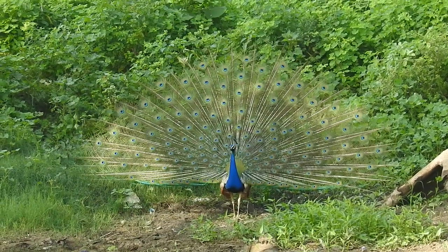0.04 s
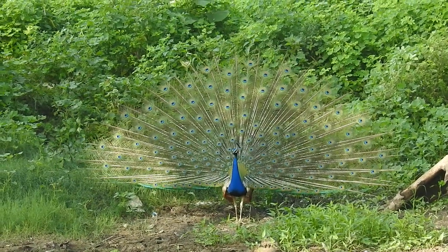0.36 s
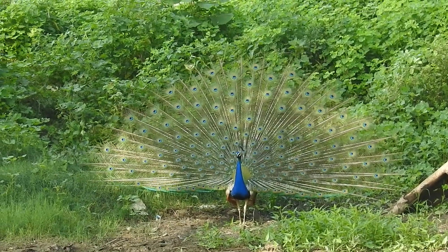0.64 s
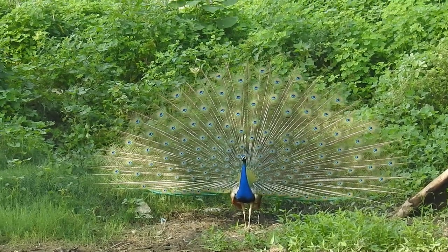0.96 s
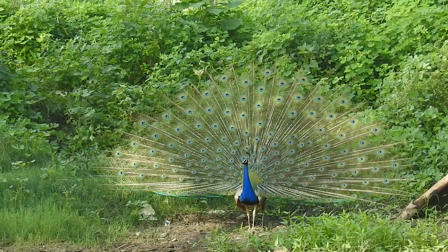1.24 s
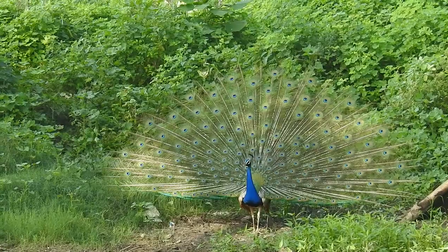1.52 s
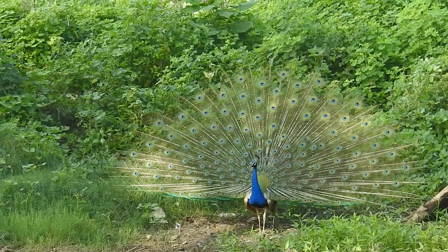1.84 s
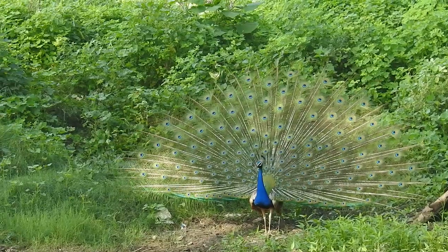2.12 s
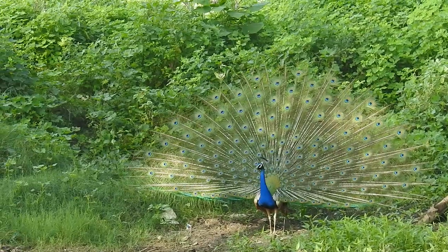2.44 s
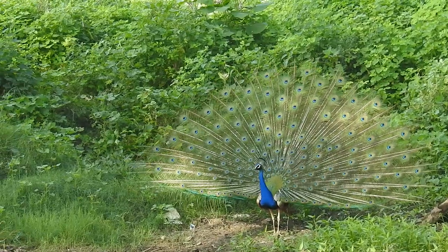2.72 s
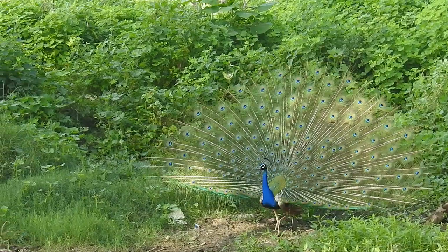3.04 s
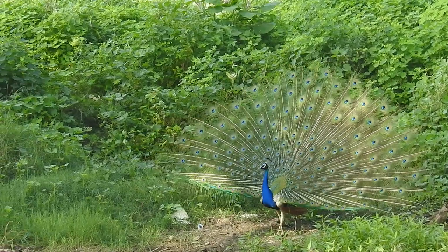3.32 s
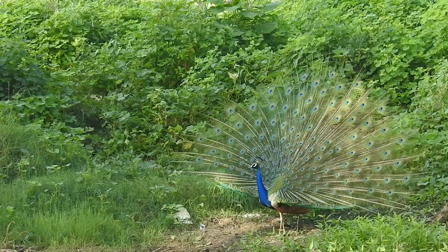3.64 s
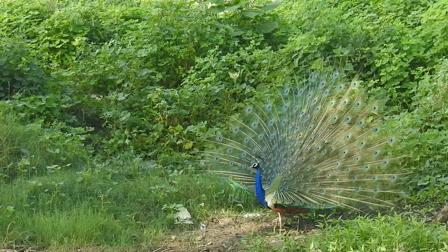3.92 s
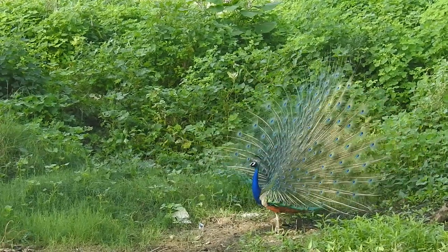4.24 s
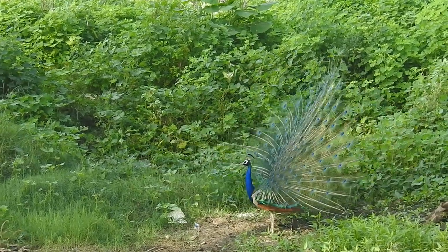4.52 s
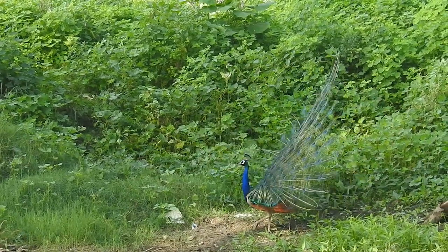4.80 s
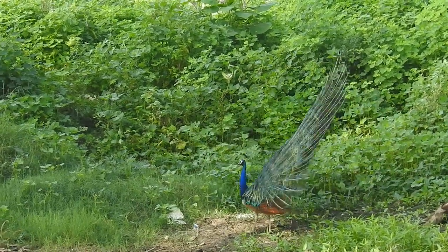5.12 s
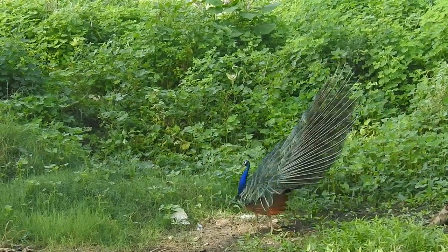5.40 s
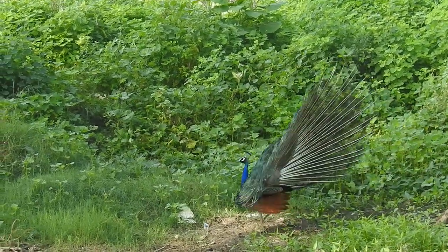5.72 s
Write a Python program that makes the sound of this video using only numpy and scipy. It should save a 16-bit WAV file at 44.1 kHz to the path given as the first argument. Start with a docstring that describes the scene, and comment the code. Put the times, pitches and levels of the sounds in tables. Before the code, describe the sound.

Harsh peacock screams ring out about once a second in a wood, with faint chirps, far coos and steady leaf hiss.

```python
"""A peacock stands at the edge of a wood; a distant engine throbs under hissing foliage and small birds chirp.
At once comes the first of six harsh, arching screams, a bird's membrane driven into rasp, scattering in
the trees. From 0.9 s far birds coo and whoop; at 2 s a hoarse wail starts to sink and a gust puffs by.
Three dry ticks snap between 3 and 4 s, then double chips and clear mews lead up to the last scream."""
import sys
import numpy as np
from scipy import signal
from scipy.fft import rfft, irfft, next_fast_len
from scipy.io import wavfile

SR = 44100
rng = np.random.default_rng(int(sys.argv[2]) if len(sys.argv) > 2 else 0)


def store_wav(level_fs):
    """Save 16-bit WAV to argv[1]."""
    pcm = np.round(np.clip(np.atleast_2d(level_fs), -1, 1) * 32767)
    wavfile.write(sys.argv[1], SR, pcm.T.astype(np.int16))


N = 262836
TIME = np.arange(N) / SR
CUTOFF_HZ = 15600

# Six screams, the first in two parts: (time [s], climb [s], hold [s], tumble [s], start pitch [Hz],
# top pitch [Hz], break pitch [Hz], climb level [dB], top level [dB], break level [dB],
# held rasp [0-1], sliding rasp [0-1], odd harmonics [dB])
SCREAMS = [ (.175, 0.053, 0.016, 0.031, 1850, 2876, 2563, -23.5, -22, -19, 0.37, 0.46, -9.5),
           (0.294, 0.013, 0.017, 0.023, 2493, 2550, 2360, -36, -22, -18.5, 0.4, 0.6, -4.5),
           (1.152, .052, .048, 0.031, 800, 2680, 2420, -22, -29, -15.5, .26, 0.82, -5),
           (2.202, .072, 0.033, 0.18, 1500, 2751, 2553, -20, -31, -19, .46, .66, -2),
           (3.297, .06, .041, 0.177, 1348, 2950, 2572, -22.5, -26, -19, .42, .66, -1),
           (4.565, .116, .117, .085, 780, 2800, 1600, -19, -17.5, -21.5, .34, .52, 2),
           (5.43, 0.051, 0.046, 0.033, 746, 2736, 2424, -20.5, -25, -16.5, 0.24, .75, -4)]
# Colour of the rasp: (frequency [Hz], level [dB])
RASP_EQ = [(1200, -60), (1900, -6), (2600, -3.5), (4100, 9.5), (5200, -5.5), (6200, 0.5), (7300, 0.5),
           (8500, -10.5), (10000, -13.5), (13000, -45)]
def screams(jitter=0.0505, shake=0.83, beat=0.65, beat_hz=620, fade_db_per_s=102, beak_opens_s=0.033):
    """A hard-driven membrane brightens and turns chaotic: it beats, shakes and breaks into rasp."""
    out, size = np.zeros(N), SR // 2
    for start, climb, hold, tumble, *arch_hz, climb_db, top_db, break_db, held, sliding, odd_db in SCREAMS:
        t, gate, pitch = arch_pitch(climb, hold, tumble, *arch_hz, slack_hz=838, relax_s=.035)
        break_s, n = climb + hold, len(t)
        # Pushed on the way up and again at the break, then left to fade.
        level_db = np.interp(t, [0, .6 * climb, climb, break_s], [climb_db - 8, climb_db, top_db, break_db])
        level_db -= fade_db_per_s * np.maximum(t - break_s, 0)
        # The voice clears along its top and roughens after the break.
        rasp_times = [climb, climb + .75 * hold, break_s, break_s + 0.028]
        rasp = np.interp(t, rasp_times, [sliding, held, held, sliding])
        tilt_db = 0.47 * np.minimum(level_db + 24, 0)   # softer is duller
        tone = syrinx(pitch * (1 + jitter * rasp * flutter(size, 450)[:n]), tilt_db, odd_db)
        beat_rate = beat_hz * (1 + 0.2873 * flutter(size, 55.7)[:n])
        sidebands = 1 + beat * rasp * np.sin(phase_of(beat_rate))
        voice = np.sqrt(1 - rasp ** 2) * tone * sidebands + rasp * stereo_noise(RASP_EQ, size)[0, :n]
        beak = np.clip(t / beak_opens_s, 0, 1) ** 2   # the treble comes out as the beak opens
        voice = beak * voice + (1 - beak) * lowpass(voice, 3680)
        tremor = 1 + shake * rasp * np.tanh(flutter(size, 300)[:n])
        add(out, start, gate * from_db(level_db) * voice * tremor)
    return out


# Resonances of the throat: (frequency [Hz], level [dB])
THROAT_EQ = [(600, -24), (1200, -4), (2000, -9), (2700, 4.5), (3600, 4.5), (5000, 6), (6000, 2), (7300, -7),
             (8500, -13.5), (10000, -18.5), (12500, -39.5)]
def syrinx(pitch, tilt_db, odd_db):
    """A vibrating membrane's harmonics, tilted per octave and shaped by the throat, at constant power."""
    order = np.arange(1, 13)[:, None]
    source_db = tilt_db * np.log2(order) + odd_db * (order % 2)
    gains = from_db(at_hz(THROAT_EQ, order * pitch) + source_db) * (order * pitch < CUTOFF_HZ)
    tone = (gains * np.sin(order * phase_of(pitch))).sum(0)
    return tone / np.sqrt((gains ** 2).sum(0) / 2 + 1e-12)


# Whistles inside the screams: (time [s], length [s], start pitch [Hz], end pitch [Hz], level [dB])
SECOND_VOICE = [(.175, .035, 3850, 4000, -25), (.24, 0.073, 3870, 3280, -17.5),
                (1.15, 0.041, 2704, 3400, -27.5), (1.195, 0.039, 3553, 3300, -19.5),
                (2.21, .045, 3400, 4500, -21.5), (2.238, .046, 3750, 3595, -17),
                (2.36, .03, 3440, 3400, -23.5), (3.305, 0.036, 3260, 3980, -22.5),
                (4.648, .04, 5000, 3400, -17.5), (4.695, .04, 5000, 4400, -18),
                (4.74, 0.067, 4165, 3250, -19.5)]
def second_voice():
    """A clearer voice slides through the rasp of the screams."""
    return glides(SECOND_VOICE, arch=.005, waver=0.013, waver_hz=380, overtone_db=-14.5)


# Mewing calls: (time [s], climb [s], hold [s], tumble [s], start pitch [Hz], top pitch [Hz],
# break pitch [Hz], level [dB])
MEWS = [(4.895, 0.033, .022, .12, 3200, 3680, 3450, -31), (5.125, .075, .018, .135, 2744, 5405, 4900, -39),
        (5.204, 0.014, .03, 0.019, 3945, 3900, 2950, -28.5)]
def mews(jitter=0.04, swell_db_per_s=110, fade_db_per_s=60):
    """Clear arched calls that swell up to the break and fade after it."""
    out = np.zeros(N)
    for start, climb, hold, tumble, *arch_hz, level_db in MEWS:
        t, gate, pitch = arch_pitch(climb, hold, tumble, *arch_hz, slack_hz=1920, relax_s=.033)
        past_break = t - climb - hold
        swell_db = np.minimum(swell_db_per_s * past_break, -fade_db_per_s * past_break)
        tone = whistle(pitch * (1 + jitter * flutter(SR, 315)[:len(t)]), overtone_db=-13)
        add(out, start, gate * from_db(level_db + swell_db) * tone)
    return lowpass(out, 7500)


# One bird's pips on a single note: (time [s], level [dB])
BIRD_PIPS = [(.03, -37.5), (.55, -38.5), (4.039, -40.5), (4.282, -33), (4.53, -32), (5.025, -39),
             (5.77, -37)]
# Another's double chips: (time [s], level [dB])
DOUBLE_CHIPS = [(3.954, -44), (4.196, -37.5), (4.442, -35.5)]
# Single slurs: (time [s], length [s], start pitch [Hz], end pitch [Hz], level [dB])
SLURS = [(1.01, 0.095, 4260, 3720, -41), (1.42, .07, 3300, 2810, -39.5), (1.45, 0.04, 3630, 4110, -34),
         (1.55, 0.059, 2880, 2440, -42), (1.83, .1, 3930, 3900, -43), (1.92, 0.062, 3110, 2630, -40),
         (1.98, .08, 3940, 3940, -40.5), (2.575, 0.073, 3470, 2590, -39)]
def small_birds(pip_s=0.035, pip_hz=4347, chip_s=.022, chip_hz=5200, chip_gap_s=0.019):
    """Thin whistles from the near bushes; each double chip is a shallow fall, then a steep one."""
    pips = [(start, pip_s, pip_hz, pip_hz, db) for start, db in BIRD_PIPS]
    chips = [(start + delay, chip_s, chip_hz, end_hz, db)
             for start, db in DOUBLE_CHIPS for delay, end_hz in [(0, 4680), (chip_gap_s, 4070)]]
    return (glides(pips, arch=.004, waver=0.0064)
            + glides(chips, arch=0.02, waver=0.0062)
            + glides(SLURS, arch=0.0085, waver=.018, waver_hz=300))


# Dry ticks: (time [s], relative level [dB])
DRY_TICKS = [(3.243, -25), (3.6418, -20), (3.85, -19)]
def ticks(t60_s=0.019, trim_db=-7, size=SR // 10):
    """Bright snaps of noise that die within milliseconds."""
    out = np.zeros(N)
    decay_db = -60 * TIME[:size] / t60_s
    for start, level_db in DRY_TICKS:
        snap = stereo_noise([(1200, -33), (4500, 5), (8000, 4), (14000, -38)], size)[0]
        add(out, start, from_db(level_db + trim_db + decay_db) * snap)
    return out


def chatter(from_s, to_s, floor_db, count):
    """Many small birds far off slur short hoarse notes at random."""
    when, length, height, slide, strength = rng.random((count, 5)).T
    starts = from_s + when * (to_s - from_s)
    from_hz = 2500 + 1900 * height
    to_hz = from_hz * (.72 + 0.32 * slide)
    notes = zip(starts, 0.033 + 0.088 * length, from_hz, to_hz, floor_db + 4 * strength)
    return glides(notes, arch=0.0524, waver=0.027, waver_hz=310)


# Whoops, each one arch of pitch: (time [s], length [s], base pitch [Hz], level [dB])
FAR_WHOOPS = [(.95, 0.18, 627, -44.5), (1.22, 0.163, 593, -45), (1.37, 0.09, 660, -49),
              (1.73, 0.14, 601, -46.5), (3.06, 0.1, 615, -41.5), (3.24, 0.08, 610, -39),
              (3.335, 0.066, 773, -35), (3.49, 0.0935, 749, -36.5), (3.6, 0.12, 678, -41),
              (3.74, 0.059, 607, -41), (3.8, 0.089, 532, -45)]
# A dove's coos: (time [s], length [s], start pitch [Hz], level [dB])
DOVE_COOS = [(.9, 0.11, 560, -50), (1.25, 0.54, 533.5, -57.5), (2.07, 0.079, 550, -45.5),
             (2.8, 0.13, 559, -45), (3.18, 0.46, 528, -49.5), (4.0, 0.11, 557, -47),
             (4.79, 0.117, 566, -46.5), (5.13, 0.58, 514, -50)]
def far_birds(coo_end_hz=530):
    """Two bouts of whoops, and a dove whose every coo settles on the same low note."""
    whoops = [(start, length, hz, hz, db) for start, length, hz, db in FAR_WHOOPS]
    coos = [(start, length, hz, coo_end_hz, db) for start, length, hz, db in DOVE_COOS]
    return glides(whoops, arch=0.155, waver=0.039) + glides(coos, arch=0.0066, waver=0.018)


# Contour of the far wail: (time [s], pitch [Hz], level [dB])
WAIL_CURVE = [(2.0, 1140, -52.5), (2.15, 1098, -45), (2.6, 1031, -51.5), (3.25, 894, -50.5)]
def wail(width_hz=110, size=2 * SR):
    """A hoarse, blurred tone: a narrow band of noise that sinks slowly."""
    out = np.zeros(N)
    times, pitches, levels_db = np.transpose(WAIL_CURVE)
    t = times[0] + TIME[:size]
    gate = np.clip(np.minimum(t - times[0], times[-1] - t) / .008, 0, 1)
    phase = phase_of(np.interp(t, times, pitches))
    band = flutter(size, width_hz) * np.cos(phase) + flutter(size, width_hz) * np.sin(phase)
    add(out, times[0], gate * from_db(np.interp(t, times, levels_db)) * band)
    return out


# Drift of the engine: (time [s], third harmonic [Hz], relative level [dB])
ENGINE_DRIFT = [(0.0, 96.0, -40.5), (2.17, 91.4, -39.5), (2.79, 96.1, -40), (5.96, 96.2, -40.5)]
# Successive multiples of the firing rate: (relative level [dB])
EXHAUST_HARMONICS = [-51, -5, 2, -9.5, -10.5, -13, -19.5]
def engine(waver=.2, trim_db=-0.3):
    """Only the low harmonics of the exhaust carry this far, each wavering on the way."""
    times, third_hz, levels_db = np.transpose(ENGINE_DRIFT)
    phase = phase_of(np.interp(TIME, times, third_hz) / 3)
    throb = sum(from_db(db) * np.cos(k * phase) * (1 + waver * flutter(next_fast_len(N), 2.1)[:N])
                for k, db in enumerate(EXHAUST_HARMONICS, 1))
    return np.sqrt(2) * from_db(np.interp(TIME, times, levels_db) + trim_db) * throb


# Rise and fall of the breeze: (time [s], relative level [dB])
BREEZE_CURVE = [(0.0, -54), (2.17, -61), (2.34, -52), (5.66, -63.5), (5.96, -62)]
# One gust arriving in puffs: (time [s], level [dB])
GUST_PUFFS = [(2.35, -36.5), (2.43, -34), (2.54, -32)]
def wind(breeze_trim_db=4, puff_s=0.039, crossfeed=0.42, low_cut_hz=46):
    """Lumps of air brush each microphone port on its own; the deepest rumble does not pass."""
    ports = np.array([flutter(next_fast_len(N), 43)[:N] for port in range(2)])
    low_cut = signal.butter(4, low_cut_hz, "high", fs=SR, output="sos")
    rumble = unit_rms(signal.sosfilt(low_cut, ports))
    breeze = from_db(np.interp(TIME, *np.transpose(BREEZE_CURVE)) + breeze_trim_db)
    puffs = sum(from_db(db) * np.exp(-((TIME - centre) / puff_s) ** 2) for centre, db in GUST_PUFFS)
    return (breeze + puffs) * (rumble + crossfeed * rumble[::-1])


# Colours of the open air and of the leaves: (frequency [Hz], level [dB])
AIR_EQ = [(22, -38), (46, -2.5), (110, -0.5), (200, -8.5), (400, -23), (660, -17), (1300, -25.5),
          (2600, -17), (6600, -28.5), (9000, -40), (15500, -51)]
FOLIAGE_EQ = [(1400, -4), (2600, 8), (3200, 3), (4000, 9.5), (4700, 5), (5400, 6), (6000, 3), (6700, 6.5),
              (8500, -28), (13000, -40)]
def air_and_foliage():
    """A steady bed: low outdoor air under the hiss of leaves."""
    return from_db(-41.5) * stereo_noise(AIR_EQ) + from_db(-46.5) * stereo_noise(FOLIAGE_EQ)


# Stereo image of diffuse sound: (frequency [Hz], left-right correlation [0-1])
CORRELATION = [(40, 1), (130, 0.96), (1000, 0.9), (4000, 0.7), (12000, 0.022)]
def stereo_noise(spectrum, size=N):
    """Coloured noise from all round, centred in the bass and wide in the treble."""
    padded = next_fast_len(size)
    hz = np.fft.rfftfreq(padded, 1 / SR)
    mid, side = rfft(rng.standard_normal((2, padded))) * from_db(at_hz(spectrum, hz))
    alike = at_hz(CORRELATION, hz)
    ears = np.sqrt(1 + alike) * mid + np.sqrt(1 - alike) * side * [[1], [-1]]
    return unit_rms(irfft(ears, padded)[:, :size])


def woodland(x, near_db, far_db, near_t60_s=.22, far_t60_s=0.62, lag_samples=1.22):
    """Near leaves scatter the sound densely, far trunks return a long tail; the left ear hears it first."""
    t = TIME[:SR]
    near = unit_rms(from_db(-60 * t / near_t60_s) * (1 - np.exp(-t / 0.00039)))
    far = unit_rms(from_db(-60 * t / far_t60_s) * (1 - np.exp(-t / 0.025)))
    scatter = stereo_noise([(2000, -3.5), (7500, 5.5), (12000, -2)], SR)
    response = scatter * np.hypot(from_db(near_db) * near, from_db(far_db) * far) / np.sqrt(SR)
    left, right = x + signal.fftconvolve(x[None], response, axes=1)[:, :N]
    return np.array([left, np.interp(TIME - lag_samples / SR, TIME, right)])


def arch_pitch(climb, hold, tumble, from_hz, top_hz, break_hz, slack_hz, relax_s):
    """Time, gate and pitch of a call that climbs, sags, then breaks and relaxes towards its slack pitch."""
    t = np.arange(int((climb + hold + tumble) * SR)) / SR
    gate = np.clip(np.minimum(t / 0.0077, (t[-1] - t) / 0.011), 0, 1)   # quick attack and release
    rising = from_hz + (top_hz - from_hz) * np.sin(.5 * np.pi * t / climb) ** 2
    sagging = top_hz + (break_hz - top_hz) * (t - climb) / hold
    falling = slack_hz + (break_hz - slack_hz) * np.exp((climb + hold - t) / relax_s)
    return t, gate, np.select([t < climb, t < climb + hold], [rising, sagging], falling)


def glides(notes, arch, waver, waver_hz=90, overtone_db=-40):
    """Short wavering whistles that swell and fade, their pitch lifting in the middle."""
    out = np.zeros(N)
    unsteady = 1 + waver * flutter(SR, waver_hz)
    for start, length, from_hz, to_hz, level_db in notes:
        progress = np.linspace(0, 1, int(length * SR))
        swell = np.sin(np.pi * progress)
        wobble = np.roll(unsteady, rng.integers(SR))[:len(progress)]
        pitch = (from_hz + (to_hz - from_hz) * progress) * (1 + arch * swell) * wobble
        add(out, start, from_db(level_db) * swell * whistle(pitch, overtone_db))
    return out


def whistle(pitch, overtone_db):
    """A nearly pure tone with a weak octave above."""
    phase = phase_of(pitch)
    return np.sqrt(2) * (np.sin(phase) + from_db(overtone_db) * np.sin(2 * phase))


def flutter(size, width_hz):
    """Smooth random modulation of unit power, rolling off above width_hz."""
    hz = np.fft.rfftfreq(size, 1 / SR)
    return unit_rms(irfft(rfft(rng.standard_normal(size)) / (1 + (hz / width_hz) ** 2), size))


def phase_of(hz):
    """Running phase of a moving pitch."""
    return 2 * np.pi * np.cumsum(hz) / SR


def at_hz(points, hz):
    """Read a curve on a log-frequency axis."""
    freqs, values = np.transpose(points)
    return np.interp(np.log(np.maximum(hz, 1)), np.log(freqs), values)


def lowpass(x, edge_hz):
    """Take the treble off."""
    return signal.sosfilt(signal.butter(2, edge_hz, fs=SR, output="sos"), x)


def panned(x, left_db):
    """Lean a stereo sound to the left."""
    return x * from_db(left_db * np.array([[.5], [-.5]]))


def from_db(db):
    """Decibels to gain."""
    return 10 ** (np.asarray(db) / 20)


def unit_rms(x):
    """Scale to unit power."""
    return x / np.sqrt(np.mean(x ** 2) + 1e-20)


def add(track, start, sound):
    """Mix a sound in at a time in seconds."""
    i = int(start * SR)
    track[i:i + len(sound)] += sound[:max(N - i, 0)]


def scene():
    """Screams up front, near and far birds behind, all over a bed of foliage, engine and wind."""
    lead = woodland(screams() + second_voice(), near_db=-2.5, far_db=-10)
    close = woodland(small_birds() + ticks(), near_db=-10, far_db=-14)
    flock = chatter(0, 4.9, floor_db=-58, count=60) + chatter(1.0, 2.0, floor_db=-47.5, count=16)
    middle = panned(woodland(mews() + flock, near_db=2.5, far_db=-22), left_db=2.5)
    distant = panned(woodland(far_birds(), near_db=-4, far_db=-1), left_db=2.5)
    distant += panned(woodland(wail(), near_db=4.5, far_db=-4), left_db=4.5)
    bed = panned(air_and_foliage() + engine(), left_db=0.5) + panned(wind(), left_db=2)
    return panned(lead, left_db=1.1) + close + from_db(-2) * middle + from_db(-1) * distant + bed


def record(dry):
    """A steep high cut on the whole mix."""
    return signal.sosfilt(signal.ellip(10, .1, 80, CUTOFF_HZ, fs=SR, output="sos"), dry)


dry = scene()
out = record(dry)
store_wav(out)
```